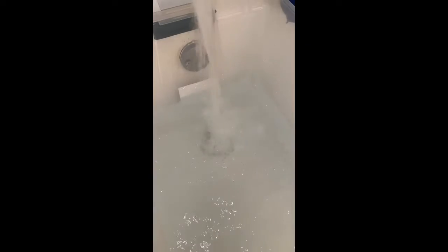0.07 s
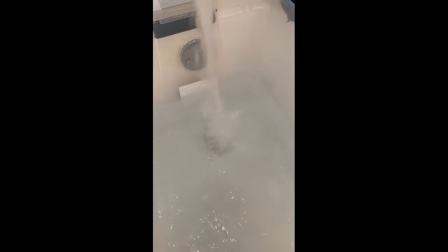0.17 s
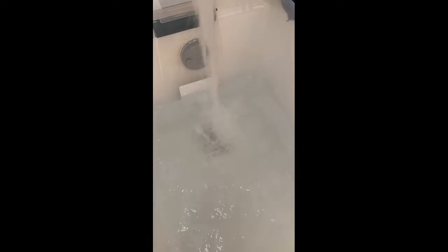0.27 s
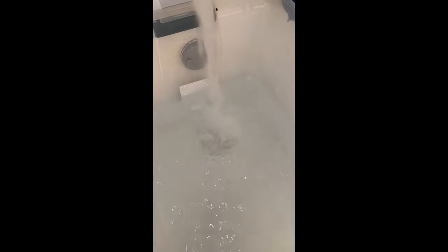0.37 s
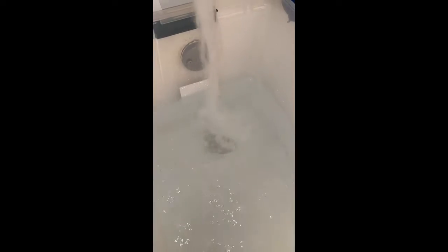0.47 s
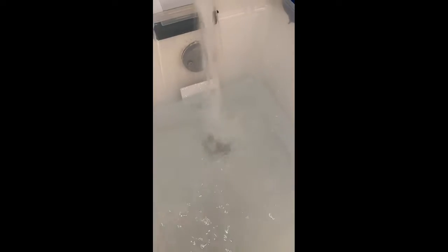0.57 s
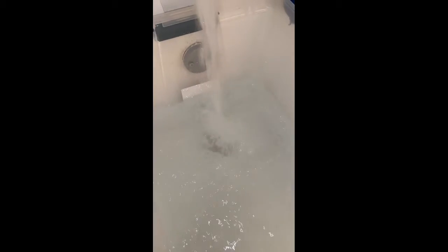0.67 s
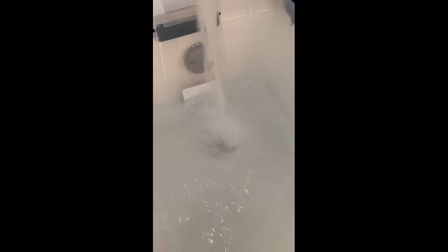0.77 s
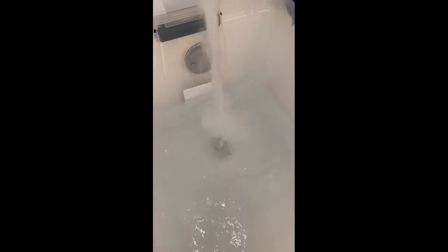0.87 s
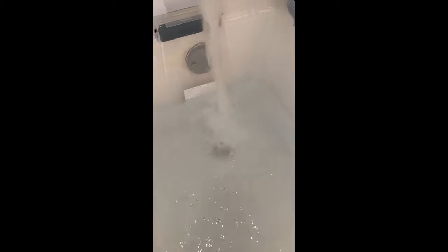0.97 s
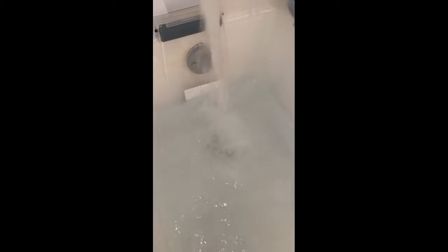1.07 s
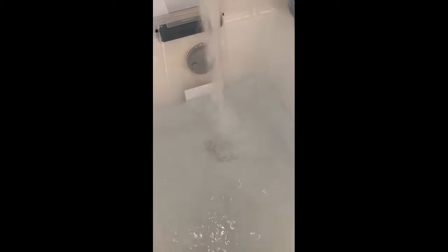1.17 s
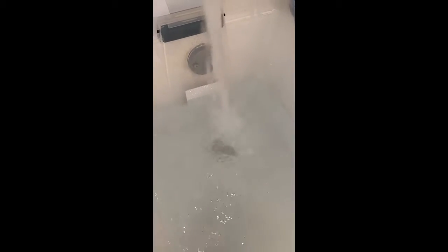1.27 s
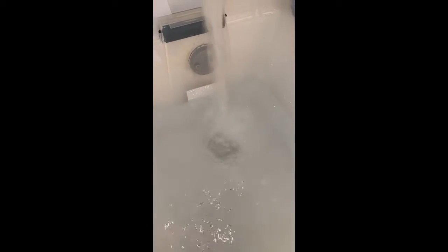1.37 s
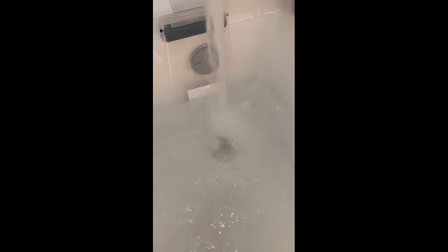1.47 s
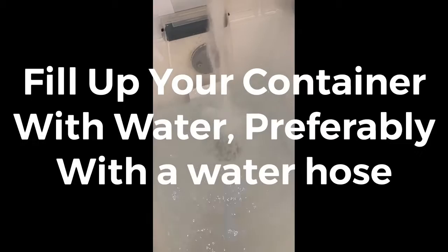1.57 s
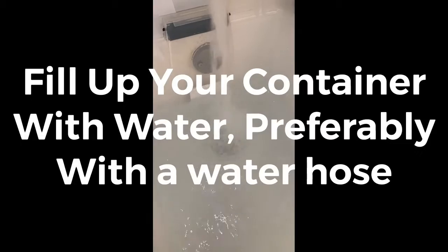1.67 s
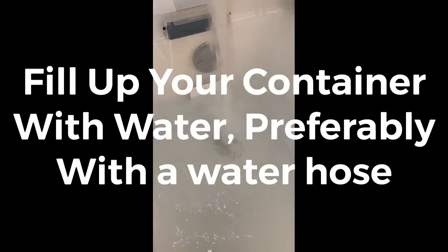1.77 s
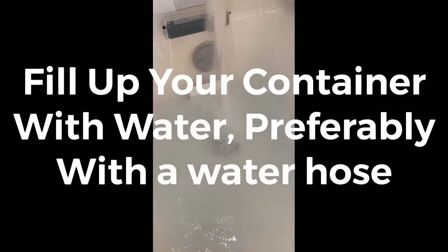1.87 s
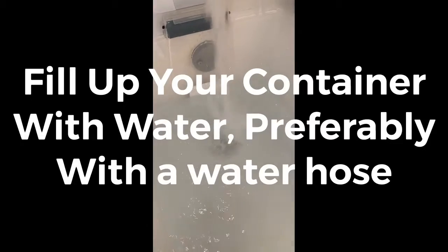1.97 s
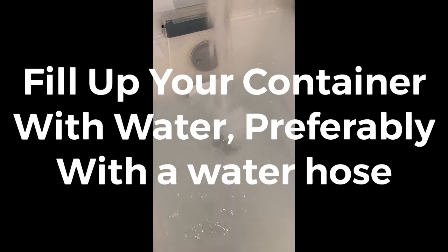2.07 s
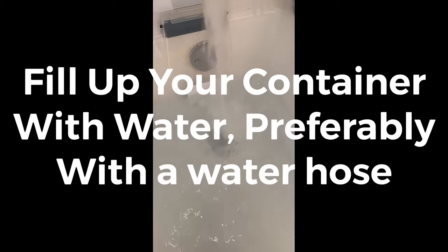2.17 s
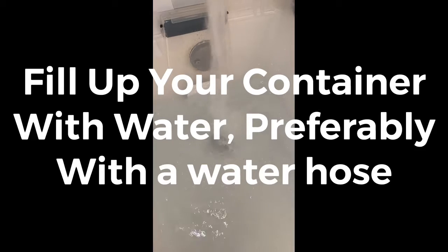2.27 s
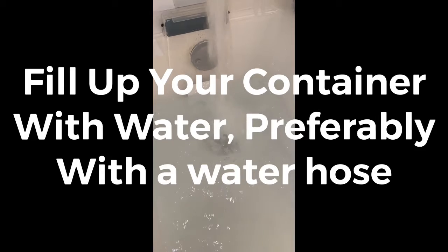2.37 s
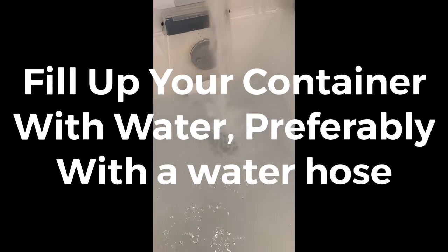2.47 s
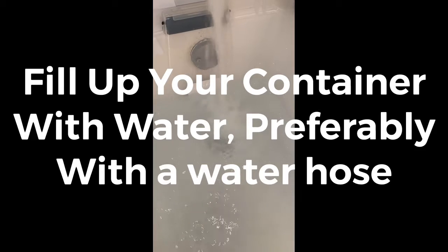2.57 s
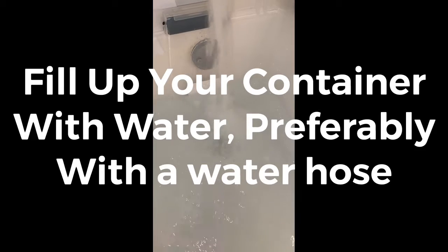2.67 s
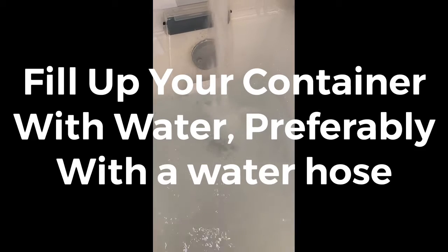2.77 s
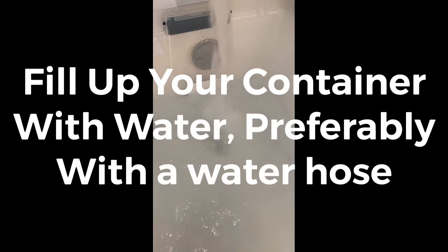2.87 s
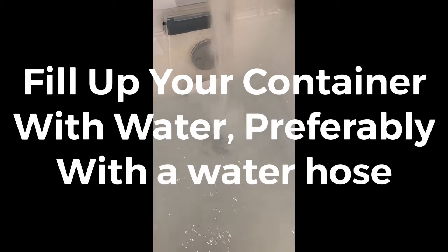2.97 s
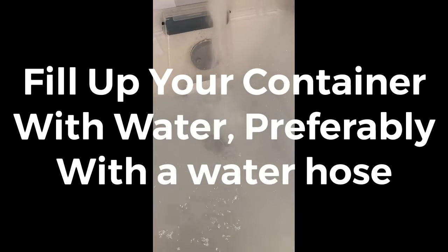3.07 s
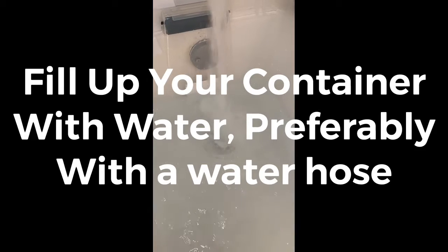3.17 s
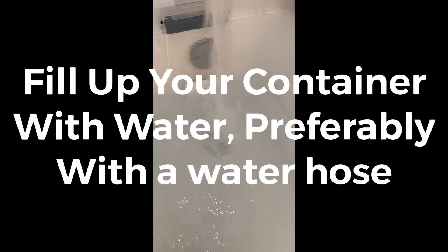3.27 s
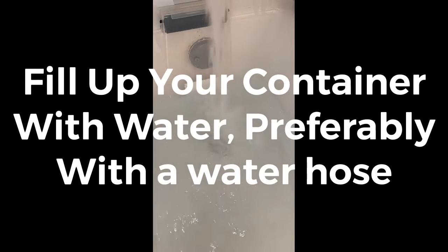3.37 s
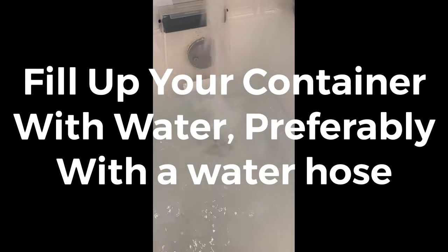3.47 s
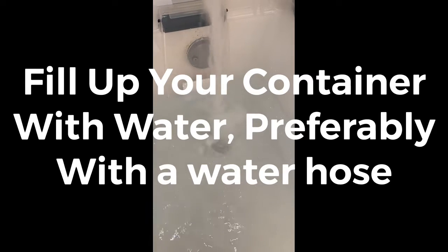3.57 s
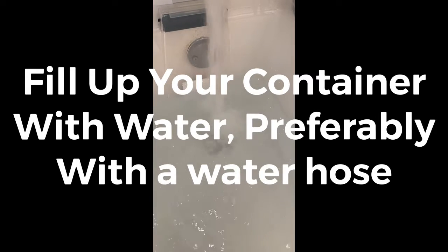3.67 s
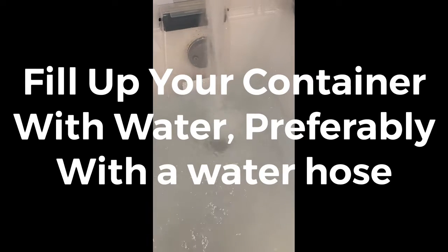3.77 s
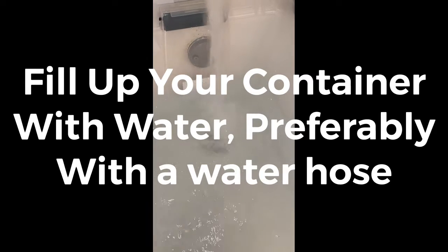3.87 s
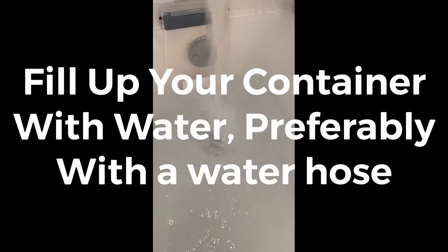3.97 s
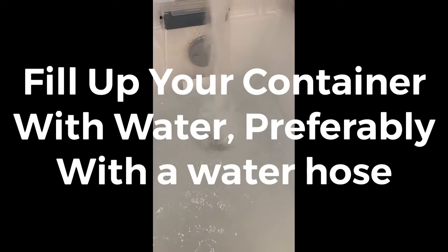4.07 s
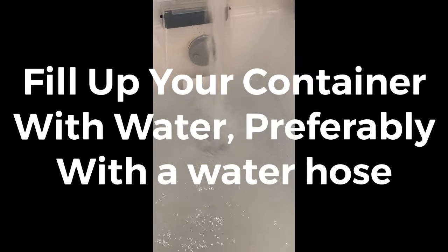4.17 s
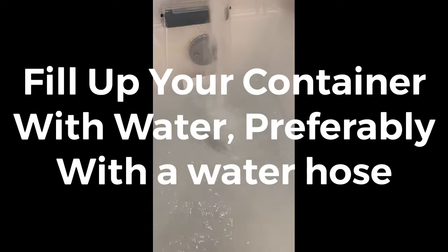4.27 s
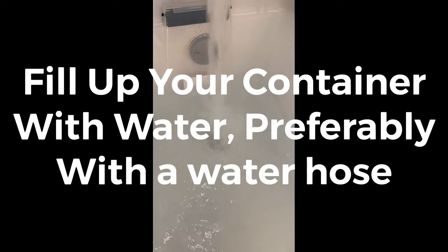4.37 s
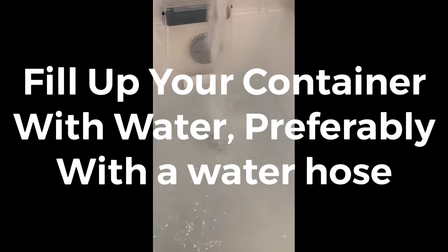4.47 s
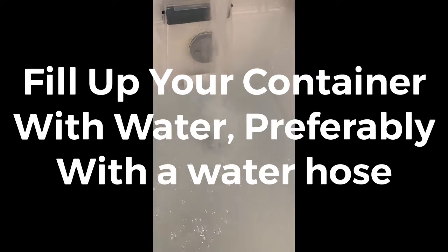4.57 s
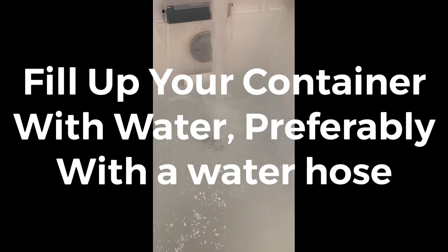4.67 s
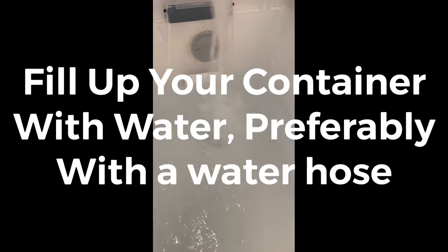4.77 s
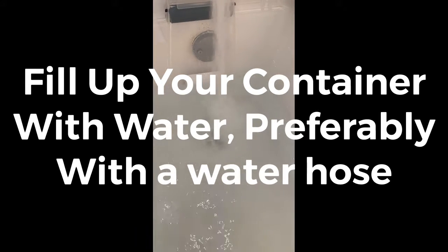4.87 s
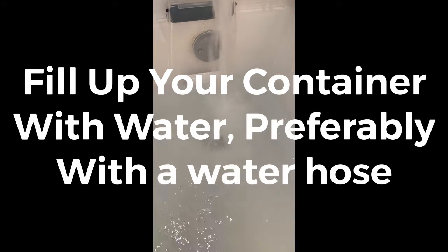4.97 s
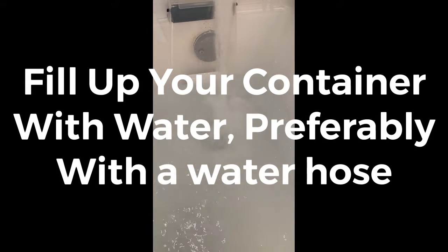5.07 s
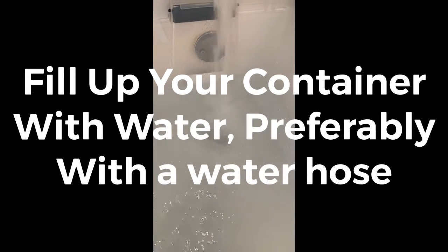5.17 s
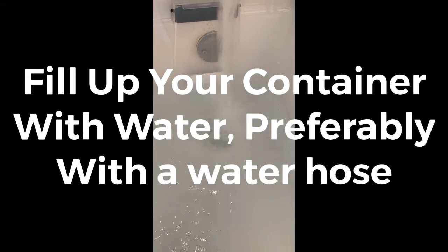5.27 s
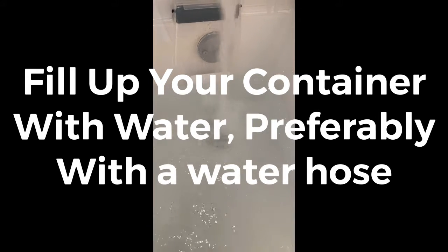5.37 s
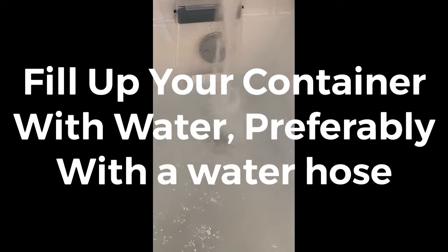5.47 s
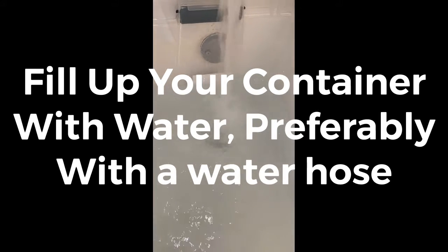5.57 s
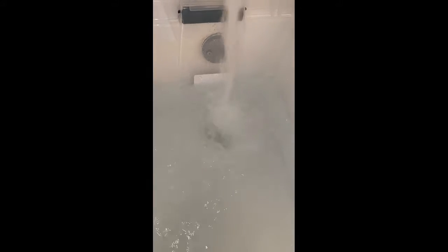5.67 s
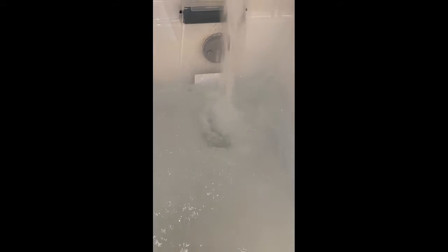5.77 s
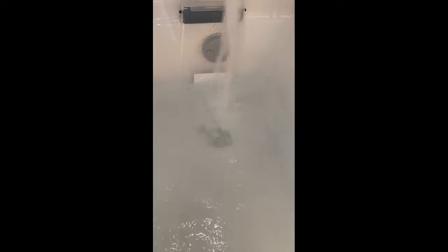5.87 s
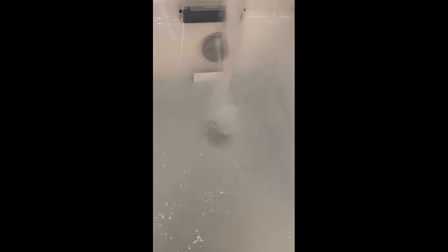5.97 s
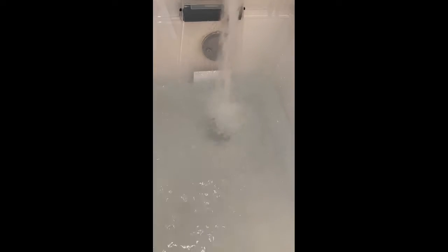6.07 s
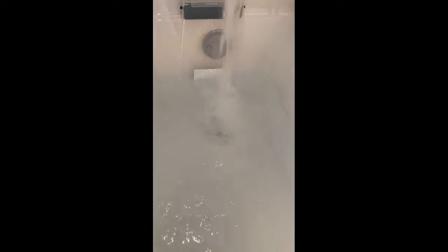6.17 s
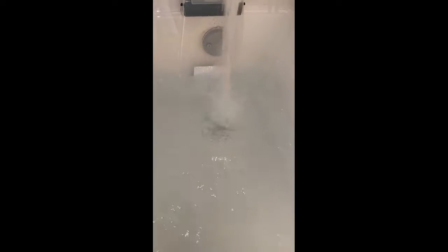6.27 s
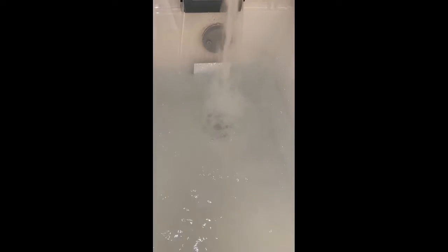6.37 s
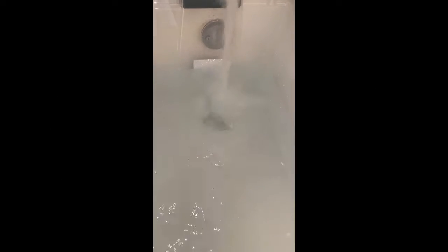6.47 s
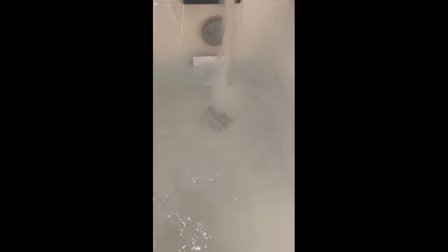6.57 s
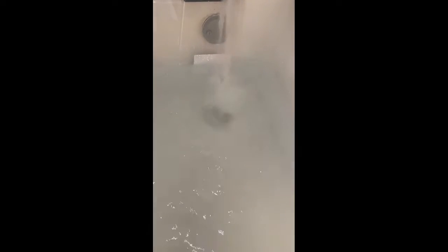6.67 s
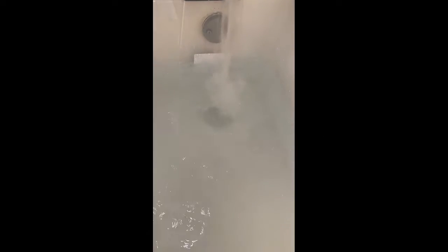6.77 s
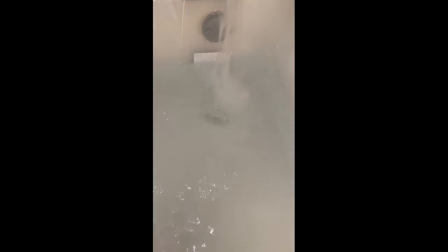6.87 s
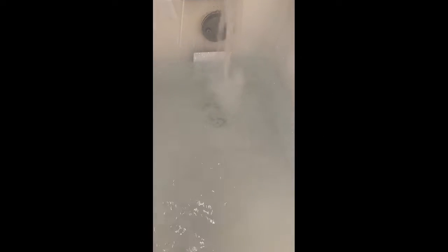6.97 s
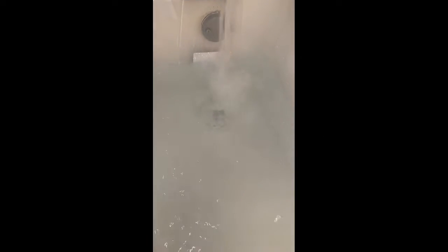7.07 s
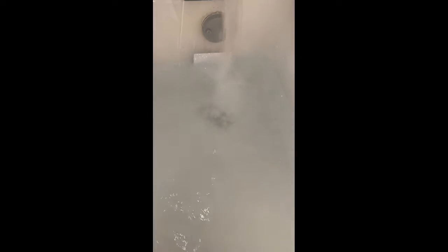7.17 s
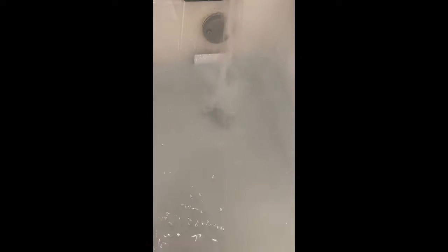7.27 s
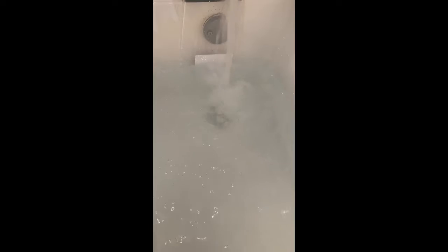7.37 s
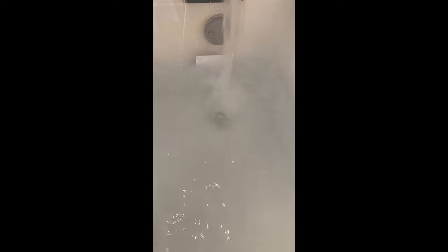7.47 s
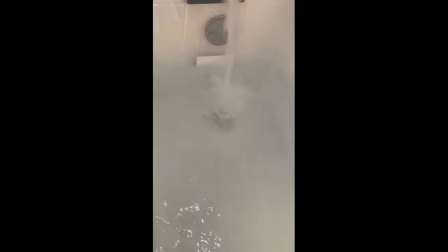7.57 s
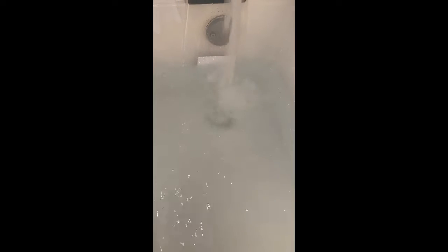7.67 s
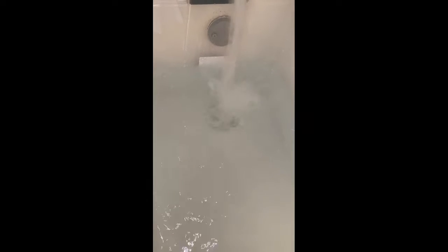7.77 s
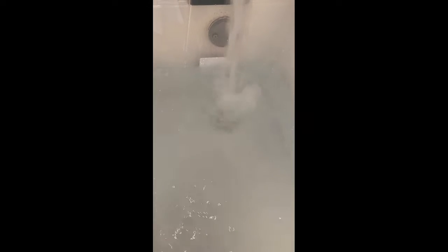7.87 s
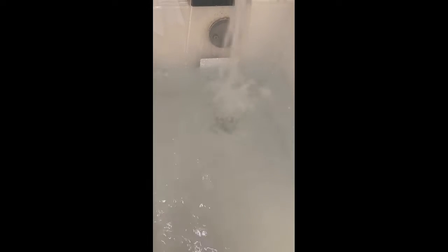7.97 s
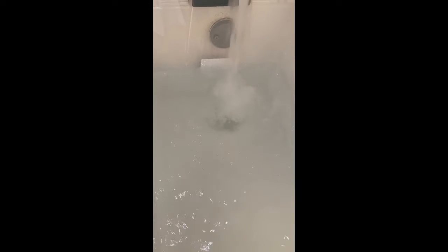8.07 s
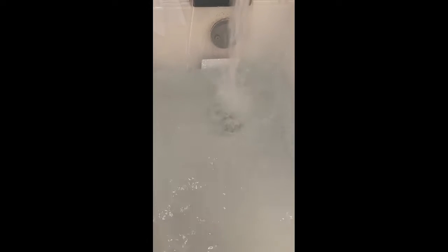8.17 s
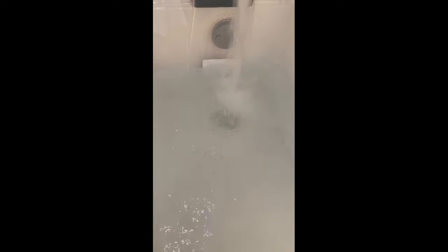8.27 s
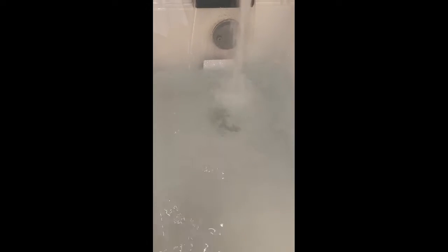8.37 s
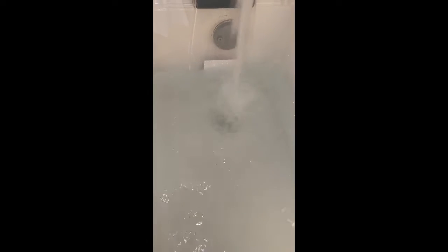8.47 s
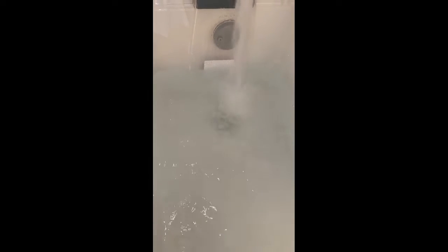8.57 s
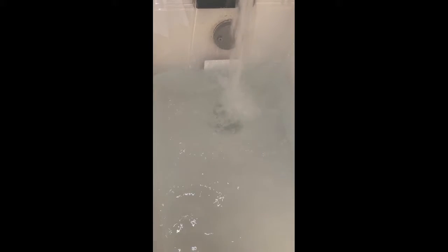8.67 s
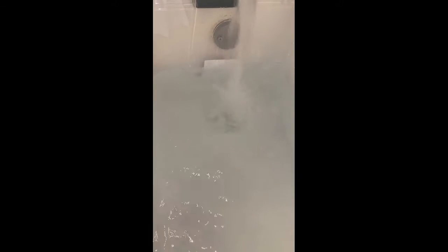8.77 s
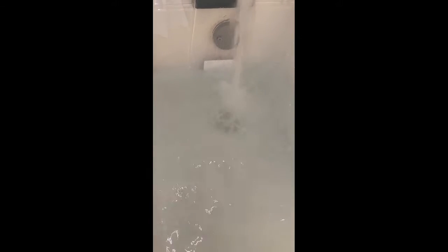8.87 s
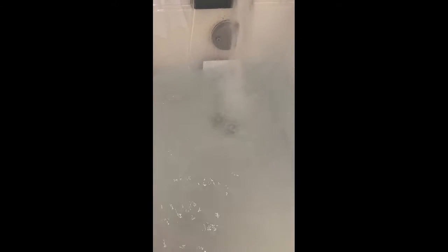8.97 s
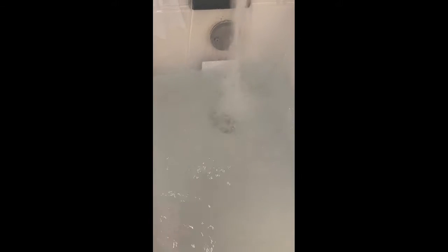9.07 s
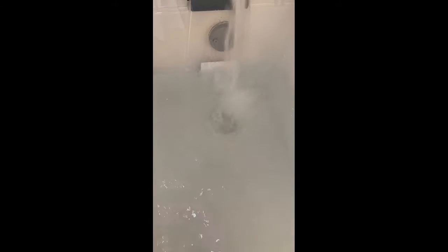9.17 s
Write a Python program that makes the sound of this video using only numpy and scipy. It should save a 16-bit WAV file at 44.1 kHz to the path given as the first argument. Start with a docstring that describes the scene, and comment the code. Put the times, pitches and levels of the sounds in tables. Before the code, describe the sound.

From 0 seconds a thick jet of water is already falling into standing water in a tub and it never stops through the end at about 9.2 seconds. The top is a dense, bright hiss, rough and flickering, made of tiny snapping bubbles and spray. Below it the churning water sounds hollow and resonant, with a soft low rumble from the tub. Large air bubbles gurgle irregularly, with stronger gulps around 3 seconds, a cluster near 4.9, and several between 6.6 and 8.3. Crisp splashes flick out throughout, more often after 5.2. The level stays even until about 3.5, then swells smoothly by roughly ten decibels until about 8.7 and holds. Around 5.5 the colour changes subtly as the microphone tilts. Close stereo perspective, the jet slightly different at each side, with diffuse short reflections from the walls.

```python
"""A thick jet of water falls into a tub of standing water; the level stays even, then rises and holds. Its torn
surface hisses and snaps: shaped noise in quick bursts, with short damped sines for bubbles. Churning water and
air dragged under excite the tub's resonances, and large bubbles gurgle. Two microphone ports hear the jet a
fraction of a millisecond apart, along with sound scattered by the walls."""
import sys
import numpy as np
from scipy import signal
from scipy.fft import rfft, irfft, next_fast_len
from scipy.io import wavfile
from scipy.ndimage import uniform_filter1d

SR = 44100
rng = np.random.default_rng(int(sys.argv[2]) if len(sys.argv) > 2 else 0)


def ratio(d):
    """dB to gain"""
    e = np.asarray(d, float) / 20
    return 10 ** e


def pcm_store(signal):
    """Save signal as 16-bit PCM."""
    levels = np.round(np.clip(np.atleast_2d(signal), -1, 1) * 32767)
    wavfile.write(sys.argv[1], SR, levels.astype(np.int16).T)


N = 406602  # samples

# Sound scattered by the walls, unrelated at the two ports.
# Each row: frequency in Hz, relative density in dB per Hz.
WALL_SPECTRUM = [(40, -12), (150, -14), (300, 1.5), (650, -1), (1500, 1.5), (3000, 3), (5000, 0.5),
                 (9000, 2), (16000, -8)]
# Rumble that drives the tub floor, ahead of the resonances.
# Each row: frequency in Hz, relative density in dB per Hz.
RUMBLE_SPECTRUM = [(20, -26), (40, 5.5), (60, -9), (100, -1), (160, 0), (230, -31.5)]
# Noise that the plunging jet feeds into the tub, ahead of the resonances.
# Each row: frequency in Hz, relative density in dB per Hz.
PLUNGE_SPECTRUM = [(130, -18), (200, -0.5), (500, 0), (1500, -3.5), (3000, -14.5), (4500, -21.5)]
# Course of the plunge against the spray.
# Each row: time in seconds, relative level in dB.
CHURN_COURSE = [(0, -1.5), (1.2, -.3), (2.8, 1.5), (3.8, -1), (4.75, -0.1), (5.9, 0.15), (7.2, 0.1),
                (7.8, .2), (9.22, -1)]
# Resonances of tub and water.
# Each row: centre in Hz, width in Hz, relative level in dB, left minus right in dB.
TUB_RESONANCES = [(67.4, 23.7, -3, -1.5), (91, 26.7, -1, -1), (122, 6.8, 1, 0), (152.4, 11, -3, -0.5),
                  (237.6, 52.6, -0.5, -1.5), (352, 23.3, 1.5, -1.5), (412, 18.2, 1, -4), (517, 47, -11, 6),
                  (580.3, 19.3, -10.5, -14), (756.6, 63, -6.5, -2), (1019.5, 19, 1.5, -1.5),
                  (1070, 12.3, 1, -8), (1190, 45, -8.5, 12.5), (1241, 22, -4.5, -2), (1375, 42, -4.5, -3),
                  (1512, 36, -2.5, -1.5), (1718, 49, -0.5, -2.5), (1790, 8.3, 0.5, -3),
                  (1947, 39, -6.5, -16.5), (2295, 56, -1, -12), (2312, 44, -3.5, -25),
                  (2660, 13, -4, -29.5), (3550, 190, -5.5, -22.5)]
# The biggest pockets of air closing under water. # Each row: start in seconds, nominal peak over the overall
# level in dB, starting pitch in Hz.
GULP_EVENTS = [(0.332, 13, 242), (1.389, 12, 220), (1.742, 12.5, 274), (2.195, 10, 360), (2.247, 10, 284),
               (2.953, 13, 263), (3.08, 17.5, 330), (3.303, 13, 735), (3.877, 15.5, 1080), (4.719, 10, 333),
               (4.845, 9, 362), (4.953, 17, 1000), (4.955, 13, 740), (4.957, 12, 300), (5.987, 11.5, 352),
               (6.653, 14, 350), (7.028, 9, 350), (7.279, 7, 230), (7.447, 12, 354), (7.547, 15, 348),
               (7.928, 15, 340), (8.05, 12.5, 412), (8.218, 15, 347), (8.525, 10.5, 1070), (8.655, 10, 213),
               (8.865, 11.5, 370), (9.059, 11, 243)]
# The clearest splashes. # Each row: start in seconds, nominal level of its snaps over the overall level in dB,
# central pitch in Hz.
SPLASH_EVENTS = [(0.280, 18, 9000), (0.7791, 4.5, 1750), (1.6162, 17, 7000), (2.0832, 21, 5970),
                 (4.146, 15, 6460), (4.1829, 20, 6560), (4.658, 10.5, 2170), (5.254, 16, 6300),
                 (5.485, 11.5, 2660), (5.6315, 18.5, 10000), (5.806, 18, 7400), (5.8865, 17.5, 10400),
                 (6.4367, 5.5, 1790), (7.0823, 10.5, 2300), (7.6554, 14, 6850), (7.7697, 21, 11000),
                 (7.8027, 17.5, 10200), (7.8927, 19.5, 11600), (8.1194, 11, 6500), (8.4252, 20.5, 6440),
                 (8.702, 5, 1670), (8.9161, 17.5, 6450), (9.1544, 17, 6360)]
# Hiss of the spray, ahead of its bursts.
# Each row: frequency in Hz, relative density in dB per Hz.
SPRAY_SPECTRUM = [(500, -30), (1200, -7), (2500, -2), (3500, 0), (5000, 0), (7300, -1.5), (8700, 1),
                  (10000, -1.5), (11200, -3.5), (13000, -5), (16000, -5)]
# Phase by which the right port lags the left (negative: leads).
# Each row: frequency in Hz, lag in radians.
PORT_LAG = [(0, 0), (450, -.2), (1000, .2), (2000, .6), (3000, 1.5), (4720, np.pi), (15400, 6 * np.pi),
            (22050, 9.1 * np.pi)]
# Bell-shaped changes of colour as the microphone tilts over the tub.
# Each row: centre in Hz, width in Hz, gain before in dB, gain after in dB.
TILT_COLOUR = [(740, 34, 1, -0.5), (1630, 59, 1.5, -0.5), (1885, 70, -2.5, 3), (1980, 43, 2.5, -1.5),
               (2294, 63, -0.5, 4.5), (2660, 89, 0.5, -1.5), (3450, 80, -0.5, 1.5), (3926, 290, 2, 1.5)]


def unit(x):
    """Normalisation: scales to rms 1."""
    return x / np.sqrt(np.mean(x ** 2) + 1e-20)


def along(points, hz):
    """Logarithmic frequency scale: reads (Hz, value) points at the frequencies hz."""
    point_hz, value = np.transpose(points)
    return np.interp(np.log(hz + 1), np.log(point_hz + 1), value)


def filtered(x, response):
    """Linear filtering: multiplies the spectrum of x by a complex response of frequency."""
    size = next_fast_len(N + SR // 2)
    spectrum = rfft(x, size) * response(np.fft.rfftfreq(size, 1 / SR))
    return irfft(spectrum, size)[..., :N]


def rush(spectrum, patchy_db, channels=1):
    """Turbulence noise: coloured, of rms 1, with random gain in patches of time and frequency."""
    z = signal.stft(rng.standard_normal((channels, N)), nperseg=256)[2]
    field = rng.standard_normal(z.shape[1:])
    field = uniform_filter1d(field, size=8, axis=0)
    field = uniform_filter1d(field, size=6, axis=1)
    noise = signal.istft(z * ratio(patchy_db * unit(field)), nperseg=256)[1][:, :N]
    return unit(filtered(noise, lambda hz: ratio(along(spectrum, hz))))


def grains(s, gain, hz, cycles, rise, size):
    """Bubble ringing: damped sines with a soft start, rising in pitch as the bubble nears the surface."""
    turn = np.arange(size) / SR * hz[:, None]  # cycles elapsed, one row per bubble
    life = turn / cycles
    envelope = gain[:, None] * np.exp(-life) * (1 - np.exp(-2 * turn))
    wave = envelope * np.sin(2 * np.pi * turn * (1 + rise * life))
    at = (s * SR).astype(int)[:, None] + np.arange(size)
    return np.bincount(at.ravel(), wave.ravel(), N + size)[:N]


def shower(count, centre_hz, spread, cycles, rise, tail_db, size):
    """Bubble population: random grains of rms 1 in all, log-normal in pitch, a few much larger."""
    when, big = rng.random((count, 2)).T
    big = np.minimum(big, .99)  # bounds the largest bubbles
    hz = np.clip(centre_hz * np.exp(spread * rng.standard_normal(count)), 60, SR / 3)
    gain = ratio(-tail_db * np.log(1 - big))
    return unit(grains(when * N / SR, gain, hz, cycles, rise, size))


def surges(count, fade_s, depth):
    """Intermittency: gain that jumps at an uneven but unbroken pace and fades again."""
    late, size = rng.random((count, 2)).T
    start = ((np.arange(count) + late) * N / count).astype(int)
    kicks = np.bincount(start, size ** 3, N)
    t = np.arange(SR // 8) / SR
    pulse = np.exp(-t / fade_s) * (1 - np.exp(-t / 0.0011))
    return 1 + depth * signal.fftconvolve(kicks, pulse)[:N]


def with_lesser(rows, count, level_db, spread_db, centre_hz, spread):
    """Event population: the listed events and further random ones scattered about a common level and pitch."""
    when = rng.random(count)
    size, pitch = rng.standard_normal((count, 2)).T
    db = level_db + spread_db * size
    hz = centre_hz * np.exp(spread * pitch)
    return np.vstack([rows, np.transpose([when * N / SR, db, hz])])


def loudness_db(s):
    """Overall level: runs evenly, rises at a steady pace in dB, then holds."""
    even_db, swell_db_per_s = -44.5, 2
    swell_from_s, hold_from_s = 3.556, 8.7
    return even_db + swell_db_per_s * (np.clip(s, swell_from_s, hold_from_s) - swell_from_s)


def loudness(over=((0, 0),)):
    """Overall level as a gain per sample, with an optional (s, dB) curve on top."""
    s = np.arange(N) / SR
    return ratio(loudness_db(s) + np.interp(s, *np.transpose(over)))


def walls(bursts):
    """Diffuse scattering: noise independent at each port follows the bursts of the jet."""
    scattered = bursts * rush(WALL_SPECTRUM, patchy_db=-2.5, channels=2)
    return loudness() * ratio(-3.0) * unit(scattered)


def tub(drive):
    """Modal resonance: each mode rings in the drive and reaches each port at its own strength."""
    side = np.array([[.5], [-.5]])  # left, right

    def modes(f):
        total = 0
        for k, (centre, width, db, pan_db) in enumerate(TUB_RESONANCES):
            mode = 1j * f * width / (centre * centre - f * f + 1j * f * width)
            total = total + (-1) ** k * ratio(db + side * pan_db) * mode  # alternating polarity
        return total

    return ratio(6.5) * filtered(drive, modes)


def plunge():
    """Forced vibration: churning water, bubbles and floor rumble drive the tub."""
    churn = surges(count=160, fade_s=0.021, depth=1.84) * rush(PLUNGE_SPECTRUM, patchy_db=1.5)[0]
    bubbles = shower(count=2200, centre_hz=1312, spread=.75, cycles=5.4, rise=0.021, tail_db=2.5, size=1200)
    water = loudness(CHURN_COURSE) * (unit(churn) + ratio(-5.5) * bubbles)
    # the heavy tub floor follows only the slow change of the overall level
    rumble = loudness() * ratio(-9.0) * rush(RUMBLE_SPECTRUM, patchy_db=-1.1)[0]
    return tub(water + rumble)


def gulps():
    """Volume oscillation of trapped air: large bubbles ring a few cycles."""
    rows = with_lesser(GULP_EVENTS, count=16, level_db=7.5, spread_db=1.5, centre_hz=312, spread=0.25)
    s, db, hz = rows.T
    return grains(s, ratio(loudness_db(s) + db), hz, cycles=3.24, rise=0.0283, size=4096)


def splashes():
    """Clustered bubble ringing: each splash is a short group of snaps around its pitch."""
    rows = with_lesser(SPLASH_EVENTS, count=18, level_db=2.5, spread_db=1.0, centre_hz=2780, spread=0.53)
    s, db, hz = np.repeat(rows, repeats=14, axis=0).T
    late, detune, size = rng.standard_normal((len(s), 3)).T
    start = s + .002 * abs(late)
    gain = ratio(loudness_db(s) + db + 2 * size)
    pitch = np.clip(hz * np.exp(0.29 * detune), 500, SR / 3)
    return grains(start, gain, pitch, cycles=2.67, rise=0.018, size=256)


def spray(bursts):
    """Surface break-up: hiss and tiny snapping bubbles burst together, fine and coarse spray partly apart."""
    hiss = rush(SPRAY_SPECTRUM, patchy_db=2.5)[0]
    fizz = shower(count=7000, centre_hz=7510, spread=.55, cycles=8.1, rise=0.014, tail_db=3.0, size=320)
    foam = bursts * (hiss + ratio(-8.0) * fizz)
    fine = filtered(foam, lambda hz: 1 / (1 + (7500 / (hz + 1)) ** 4))  # treble part
    coarse = foam - fine
    fine = surges(count=300, fade_s=0.0049, depth=0.97) * fine
    coarse = surges(count=300, fade_s=0.0049, depth=0.97) * coarse
    return loudness() * ratio(5.5) * unit(fine + coarse)


def rim(x, count, span_s, echo_db):
    """Comb interference: weak quick echoes from the sides of the tub ripple the spectrum."""
    late, size = rng.random((count, 2)).T
    delay = (late * span_s * SR).astype(int) + 60
    taps = np.bincount(delay, ratio(echo_db) * (2 * size - 1))
    taps[0] = 1  # direct sound
    return signal.fftconvolve(x, taps / np.linalg.norm(taps))[:N]


def ports(x):
    """Path difference: opposite half phase shifts make the right port lag the left."""
    half = np.array([[.5], [-.5]])
    return filtered(x, lambda hz: np.exp(1j * np.interp(hz, *np.transpose(PORT_LAG)) * half))


def tilt(x):
    """Directional colouring: the sound cross-fades from one colour to another as the microphone tilts."""
    middle_s, lasts_s = 5.5, 0.45

    def heard(column):
        def gain(hz):
            return ratio(sum(row[column] * np.exp(-((hz - row[0]) / row[1]) ** 2) for row in TILT_COLOUR))
        return filtered(x, gain)

    after = np.clip((np.arange(N) / SR - middle_s) / lasts_s + .5, 0, 1)
    return (1 - after) * heard(column=2) + after * heard(column=3)


def joint_stereo(x, margin_db, from_hz):
    """Stereo thinning: in each treble band and frame, the ports' sum or difference drops out when the other is
    much stronger."""
    sum_and_difference = np.array([x[0] + x[1], x[0] - x[1]]) / 2
    hz, _, z = signal.stft(sum_and_difference, SR, nperseg=2048)
    band = np.arange(len(hz)) // 16
    power = np.add.reduceat(abs(z) ** 2, np.arange(0, len(hz), 16), axis=1)[:, band]
    keep = (power > ratio(-2 * margin_db) * power[::-1]) | (hz < from_hz)[:, None]
    mid, side = signal.istft(z * keep, SR, nperseg=2048)[1][:, :N]
    return np.array([mid + side, mid - side])


def scene():
    """Superposition: sound straight from the jet reaches the ports apart; the walls add diffuse sound."""
    bursts = surges(count=260, fade_s=0.0072, depth=1.96)
    bright = rim(spray(bursts) + splashes(), count=24, span_s=.022, echo_db=-21)
    direct = ports(plunge() + gulps() + bright)
    return tilt(direct + walls(bursts))


def roll_off(x):
    """The treble ends steeply here."""
    return signal.sosfilt(signal.butter(12, 17050, fs=SR, output="sos"), x)


def record(dry):
    """Band limitation: the recorder keeps nothing from 15750 Hz up; then the stereo treble is thinned."""
    limited = filtered(dry, lambda hz: hz < 15750)
    thinned = joint_stereo(limited, margin_db=7.5, from_hz=4292)
    return roll_off(thinned)


dry = scene()
out = record(dry)
pcm_store(out)
```